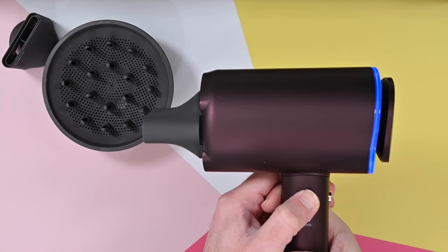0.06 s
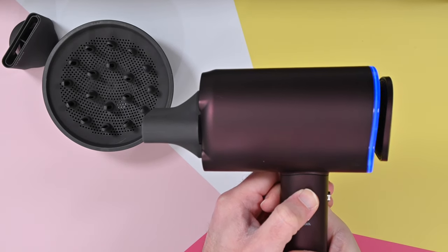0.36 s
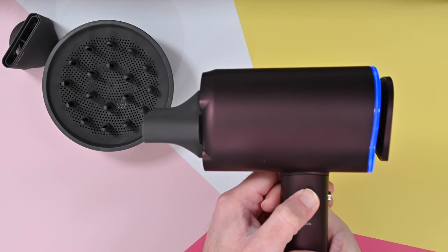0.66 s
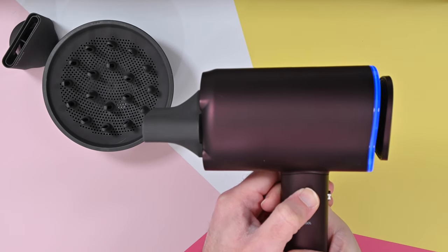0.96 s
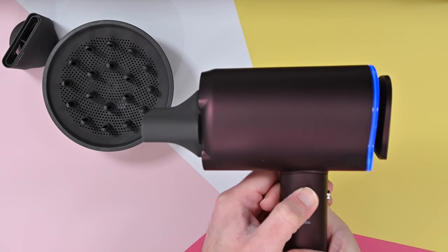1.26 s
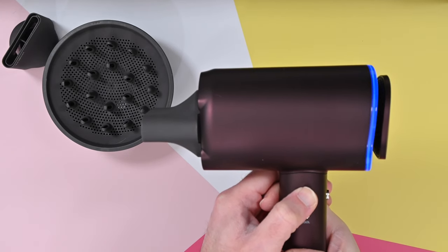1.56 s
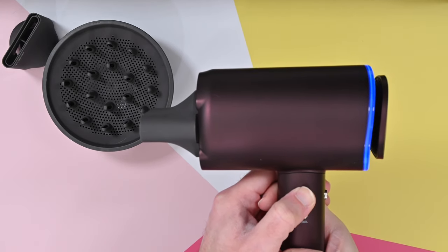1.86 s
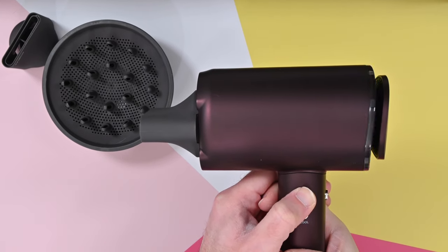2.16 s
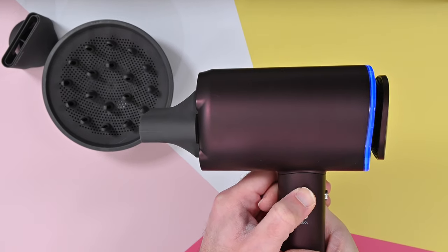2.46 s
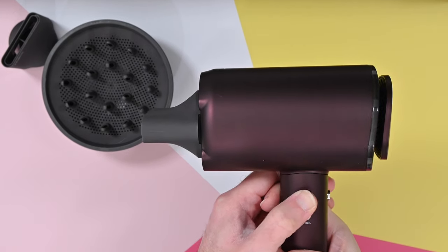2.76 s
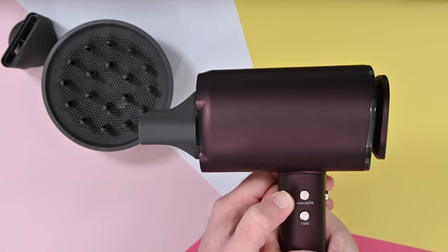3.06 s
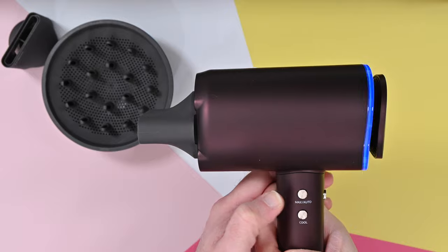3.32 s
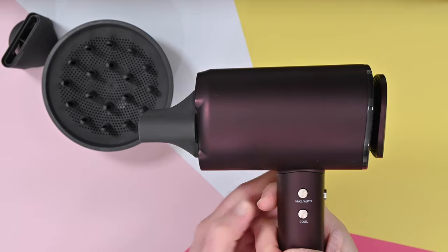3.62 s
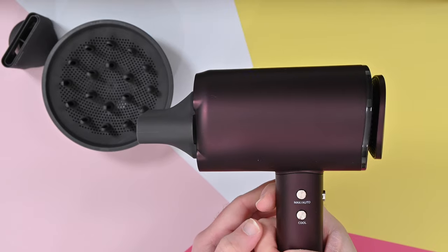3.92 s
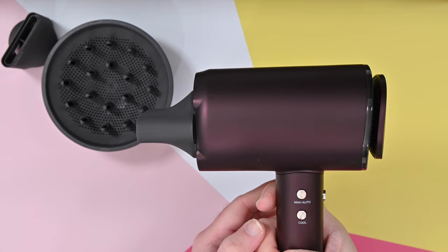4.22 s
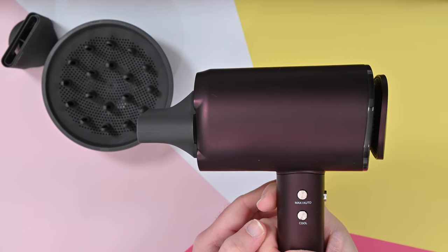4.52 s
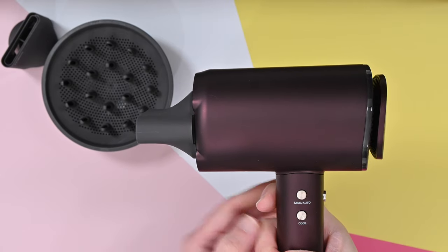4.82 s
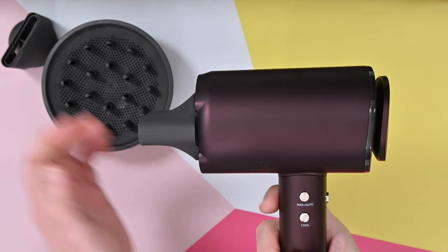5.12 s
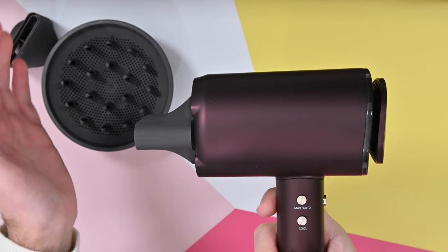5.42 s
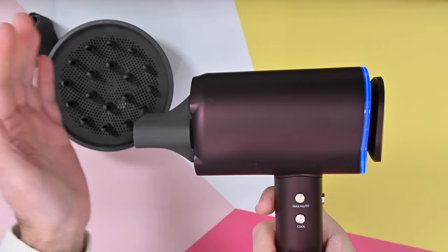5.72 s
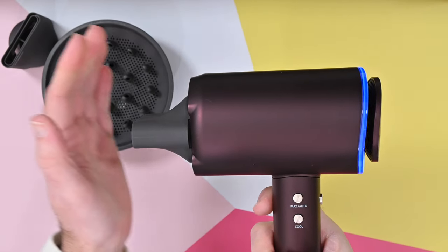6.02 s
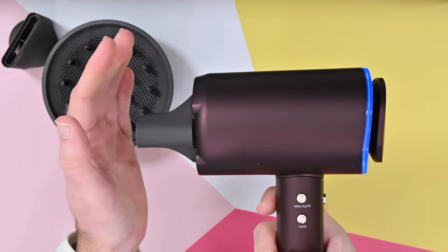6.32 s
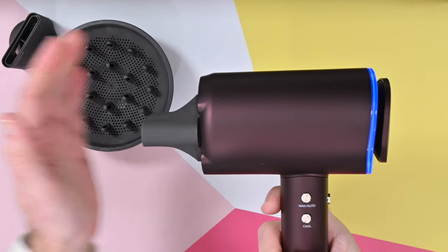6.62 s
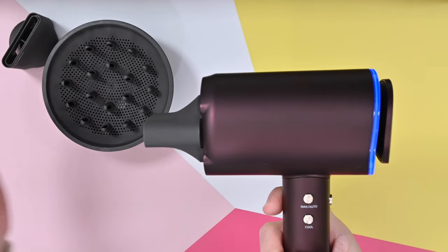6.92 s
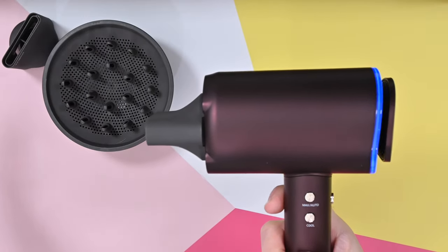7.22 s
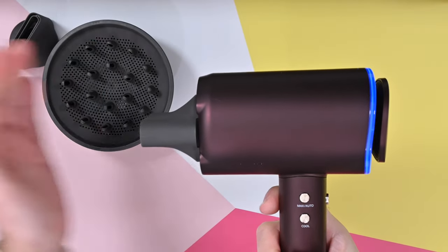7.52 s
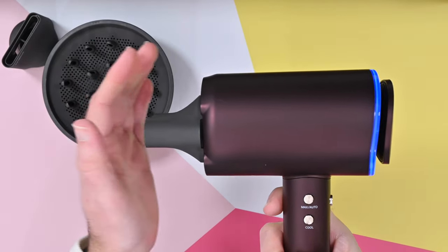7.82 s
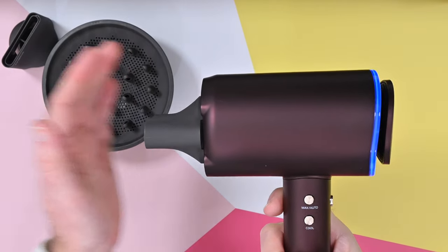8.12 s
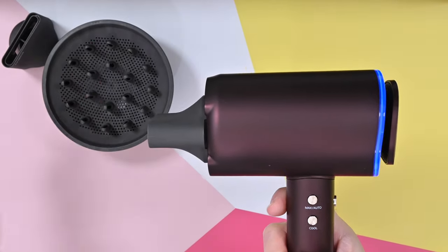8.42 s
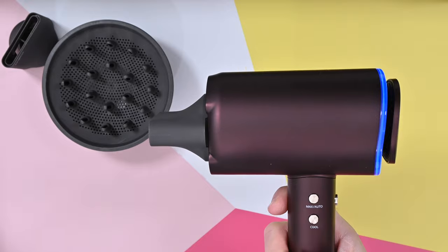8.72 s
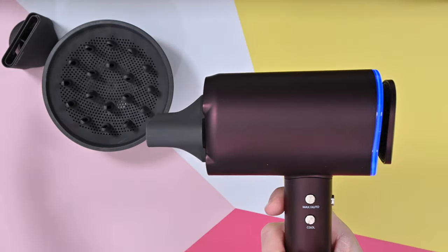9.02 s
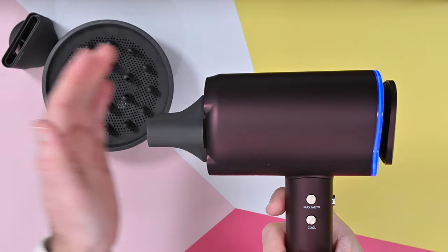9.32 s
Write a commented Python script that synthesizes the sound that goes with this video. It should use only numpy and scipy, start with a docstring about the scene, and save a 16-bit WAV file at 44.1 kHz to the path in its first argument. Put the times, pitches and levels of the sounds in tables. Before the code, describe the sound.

A hair dryer runs close to the microphone in a small room, a steady rush of air with a thin motor whine. It steps down twice, each time lower and quieter, and blows softly for a few seconds. Then it surges to full speed, louder and brighter than before. The whine wavers slightly while a palm moves in and out of the jet, subtly changing the hiss and roar, with a brief thin whistle.

```python
"""A small room, one microphone close to a hair dryer with a fast thirteen-blade fan.
The regulator steps down twice, then up to full speed, where it hunts in small steps;
the rush of air and the whine follow the shaft. In the second half a palm moves in and out
of the jet, which roars, hisses and now and then rings or whistles."""
import sys
import numpy as np
from scipy import signal
from scipy.fft import rfft, irfft, next_fast_len
from scipy.io import wavfile
from scipy.ndimage import uniform_filter1d, map_coordinates

SR = 44100
rng = np.random.default_rng(int(sys.argv[2]) if len(sys.argv) > 2 else 0)


def waveform_to_disk(signal):
    """Save audio, clipped to [-1, 1], as 16-bit WAV at the path in sys.argv[1]."""
    frames = np.transpose(np.atleast_2d(signal))
    scaled = np.clip(frames, -1, 1) * 32767
    samples = np.round(scaled).astype(np.int16)
    wavfile.write(sys.argv[1], SR, samples)


N = 417627
START_SPEED = 1249  # shaft turns per second


def airflow(frame=1024):
    """The rush: turbulence grows with fan speed, is stirred by the palm and coloured by the barrel."""
    # spectrum of the rush at the starting speed: f/Hz, relative level/dB
    spectrum = [(30, -49), (100, -31.5), (250, -12), (480, -0.84), (750, -3.5), (1100, -12.5),
                (1700, -16.5), (2600, -10.5), (3700, -18), (5800, -20.5), (7800, -26.5), (9300, -24),
                (13300, -25.5), (15600, -26.4)]
    # growth of the rush with speed: f/Hz, gain/dB per doubling
    growth = [(60, 13), (300, 15.5), (600, 14.5), (1100, 18.5), (1500, 16), (2100, 18), (3300, 16.5),
              (4300, 11), (5500, 9.5), (7200, 14), (10500, 11.5), (13000, 11.5), (15600, 13)]
    # the jet rings hollow for a moment: peak t/s, half length/s, f/Hz, half width/Hz, lift/dB
    swells = [(5.4, .2, 5150, 220, 2), (5.5, 0.26, 3220, 200, 1.5), (7.25, 0.16, 2350, 278, 7),
              (8.88, 0.17, 3420, 160, 5.5)]
    hz, t, noise = signal.stft(rng.standard_normal(N) * np.sqrt(SR / 2), SR, nperseg=frame)
    hz = hz[:, None]
    speed = shaft_speed(t)
    near, splash = palm(t)
    db = -54.9 + along(spectrum, hz) + along(growth, hz) * np.log2(speed / START_SPEED)
    db += 5.8 * bell(hz / speed, 12.9, .56)  # chopped eddies: a hump around the blade tone
    db += near * bell(hz, 300, 600)  # roar on the palm, up to 1 dB
    db += 1.5 * splash * treble(hz, 4000)  # hiss on the palm
    db -= 2.9 * splash * bell(hz, 3670, 170)  # the palm's echo cancels one band
    db += 3 * splash * bell(hz, 70, 74)  # deep buffeting as the jet breaks on the palm
    # fingers round the intake muffle the hiss until they let go
    let_go_s, release_s = 3.54, .15
    grip = .5 - .5 * np.tanh((t - let_go_s) / release_s)
    db -= 1.17 * grip * treble(hz, 2500)
    for peak_s, half_s, pitch_hz, width_hz, lift_db in swells:
        db += lift_db * bell(t, peak_s, half_s) * bell(hz, pitch_hz, width_hz)
    # near full speed the bright band of the hiss flutters
    flutter = np.interp(t, np.arange(N) / SR, wobble(20))
    db += (.5 + 1.7 * flutter) * bell(hz, 5630, 220) * bell(speed, 1350, 120)
    # the flow is never quite even
    patches = uniform_filter1d(rng.standard_normal(noise.shape), size=12, axis=0)
    patches = uniform_filter1d(patches, size=14, axis=1)
    db += .72 * patches / patches.std()
    rush = signal.istft(noise * amp(db), SR, nperseg=frame)[1][:N]
    return reflections(barrel(rush))


def barrel(rush):
    """The barrel and its surroundings put fixed peaks and notches into the rush."""
    # peaks and notches: f/Hz, half width/Hz, gain/dB
    bands = [(371, 14, -1), (417, 18, 2), (481, 14, -2.5), (517, 12, 2), (599, 10, -1.5), (646, 21, 2.5),
             (790, 11.5, -9), (861, 30, 2), (1075, 27, 2), (1278, 9.3, -7), (1312, 17, 6), (1617, 15, -9),
             (1882, 12, 6.5), (1903, 9.8, -26), (2076, 153, -3), (2490, 13, 7), (2640, 12, -10),
             (3068, 4.3, 7.5), (3615, 47, -4), (3960, 46, -3), (4200, 53, 2.5), (5060, 45, 2.5),
             (5880, 310, 4.5), (6990, 220, 3), (7780, 73, -3), (8670, 145, 3.5), (9400, 140, 3),
             (10500, 130, -2), (12720, 90, -6), (13644, 276, -5)]
    return filtered(rush, lambda hz: amp(sum(db * bell(hz, centre, width) for centre, width, db in bands)))


def motor(blades=13, build_s=.07):
    """Imbalance whines at the shaft rate and its harmonics; the blades add a thin high whistle."""
    # the housing passes the whine better at some speeds:
    # shaft f/Hz, shaft tone level/dB, third harmonic level/dB, blade tone level/dB
    housing = [(837, -51.5, -62, -57), (975, -55, -66, -54), (1003, -51.5, -66, -46.5),
               (1100, -43, -58, -45), (1249, -38.3, -48, -44), (1356, -47.5, -59, -44),
               (1374, -38, -47, -44), (1392, -38.3, -54, -44), (1410, -49, -54, -44), (1428, -52, -46, -44)]
    # tones that sing out only near one speed:
    # multiple of the shaft rate, best shaft f/Hz, half width/Hz, level/dB, fuzz (0-1), flutter/Hz
    singing = [(4, 960, 50, -52.5, .4, 60), (4.07, 837, 26, -57.5, .8, 70), (6, 1009, 21, -41, .1, 44),
               (13, 1090, 36, -33.5, .9, 200)]
    speed = shaft_speed(np.arange(N) / SR)
    near, splash = palm(np.arange(N) / SR)
    shaft_db, third_db, blade_db = curves(housing, speed)
    screened_db = -12 * near  # the palm screens the shaft tone
    thrown_db = 5 * splash  # and throws back the high tones
    wander = 1.14 * wobble(12) * (1000 / speed) ** 2  # the shaft is less steady at low speed
    angle = 2 * np.pi * np.cumsum(speed + wander) / SR
    whine = amp(shaft_db + screened_db) * tone(angle, fuzz=.038, flutter_hz=25)
    whine += amp(third_db) * tone(3 * angle, fuzz=.085, flutter_hz=43)
    whine += amp(blade_db + thrown_db + 2 * wobble(12)) * tone(blades * angle, fuzz=.18, flutter_hz=97)
    for multiple, best_speed, speed_range, db, fuzz, flutter_hz in singing:
        # a tone needs time to build, so a fast sweep hardly wakes it
        awake = uniform_filter1d(bell(speed, best_speed, speed_range), size=int(build_s * SR))
        gain = amp(db + thrown_db + 1.5 * wobble(9)) * awake
        whine += gain * tone(multiple * angle, fuzz, flutter_hz)
    return whine


def shaft_speed(t, natural_hz=3.45, damping_up=.78, damping_down=.55):
    """Turns per second: each step of the regulator overshoots a little and settles."""
    # the regulator picks a new speed: t/s, shaft f/Hz
    steps = [(1.686, 1003), (2.69, 837), (5.977, 1410), (6.25, 1392), (6.78, 1374), (7.06, 1356),
             (7.3, 1374), (7.6, 1392), (7.9, 1410), (8.46, 1400), (8.68, 1391), (9.0, 1410), (9.25, 1428)]
    speed, before = np.full(len(t), float(START_SPEED)), START_SPEED
    for start, goal in steps:
        damping = damping_up if goal > before else damping_down
        swing = np.sqrt(1 - damping ** 2)
        phase = 2 * np.pi * natural_hz * np.clip(t - start, 0, 2)
        remaining = np.exp(-damping * phase) * np.sin(swing * phase + np.arccos(damping)) / swing
        speed += (goal - before) * (1 - remaining)
        before = goal
    return speed


def palm(t, reach_cm=4.9, splash_cm=7.3, splash_range_cm=8.4):
    """Nearness and splash, both 0-1; the jet splashes most where it has spread to the hand's width."""
    # path of the palm: t/s, distance from the nozzle/cm
    path = [(4.7, 37), (5.25, 11), (5.7, 11), (6.2, 8.5), (6.5, 3.6), (6.8, 8.7), (7.2, 36), (7.5, 9.9),
            (7.75, 3), (8.0, 2), (8.3, 10), (8.6, 13), (8.9, 14), (9.15, 2.8), (9.47, 7.3)]
    cm, = curves(path, t)
    return np.exp(-cm / reach_cm), bell(cm, splash_cm, splash_range_cm)


def nozzle(edge_hz=4095, fade_s=.082):
    """A thin edge tone at the nozzle comes and goes."""
    # edge tones, both at full speed: start t/s, length/s, level/dB
    whistles = [(6.06, .2, -49), (8.12, .42, -42.5)]
    t = np.arange(N) / SR
    gain = np.zeros(N)
    for start, length, db in whistles:
        inside_s = np.minimum(t - start, start + length - t)
        gain += amp(db) * np.clip(inside_s / fade_s, 0, 1)
    return gain * tone(2 * np.pi * edge_hz * t, fuzz=.42, flutter_hz=60)


def reflections(x, wet_db=-13, t60_s=.06, taps=900):
    """Faint early echoes from the table and walls ripple the treble."""
    t = np.arange(taps) / SR
    echo = rng.standard_normal(taps) * amp(-60 * t / t60_s) * (t > .002)
    echo *= amp(wet_db) / np.linalg.norm(echo)
    wet = signal.fftconvolve(x, echo)[:N]
    return x + filtered(wet, lambda hz: treble(hz, 1900, order=4))


def tone(phase, fuzz, flutter_hz):
    """A tone of rms near 1; turbulence scatters the share fuzz of its power into a narrow band."""
    scatter = wobble(flutter_hz) * np.sin(phase) + wobble(flutter_hz) * np.cos(phase)
    return np.sqrt(2 * (1 - fuzz)) * np.sin(phase) + np.sqrt(fuzz) * scatter


def amp(db):
    """Decibels to gain."""
    return 10 ** (np.asarray(db) / 20)


def along(points, hz):
    """Points (f/Hz, value) interpolated on a log frequency axis."""
    freqs, values = np.transpose(points)
    return np.interp(np.log(hz + 1), np.log(freqs + 1), values)


def curves(rows, at):
    """Each column after the first, read where the first equals at."""
    first, *columns = np.transpose(rows)
    return [np.interp(at, first, column) for column in columns]


def bell(x, centre, width):
    """A smooth bump of height 1."""
    return np.exp(-.5 * ((x - centre) / width) ** 2)


def treble(hz, corner_hz, order=2):
    """A weight rising from 0 in the bass to 1 in the treble."""
    return hz ** order / (hz ** order + corner_hz ** order)


def wobble(rate):
    """A smooth random curve, rate knots a second."""
    knots = rng.standard_normal(int(N * rate / SR) + 4)
    return map_coordinates(knots, [np.arange(N) * rate / SR])


def filtered(x, response):
    """x with its spectrum multiplied by response(hz)."""
    size = next_fast_len(N + SR // 2)
    return irfft(rfft(x, size) * response(np.fft.rfftfreq(size, 1 / SR)), size)[:N]


def scene():
    """One close microphone on the dryer feeds both channels."""
    dryer = airflow() + motor() + nozzle()
    return np.array([dryer, dryer])


def record(dry, low_cut_hz=36, top_hz=15750):
    """The recorder thins the deepest bass and keeps nothing above its band limit."""
    def passband(hz):
        return (hz < top_hz) * hz ** 2 / np.hypot(hz ** 2, low_cut_hz ** 2)
    return np.array([filtered(channel, passband) for channel in dry])


dry = scene()
out = record(dry)
waveform_to_disk(out)
```